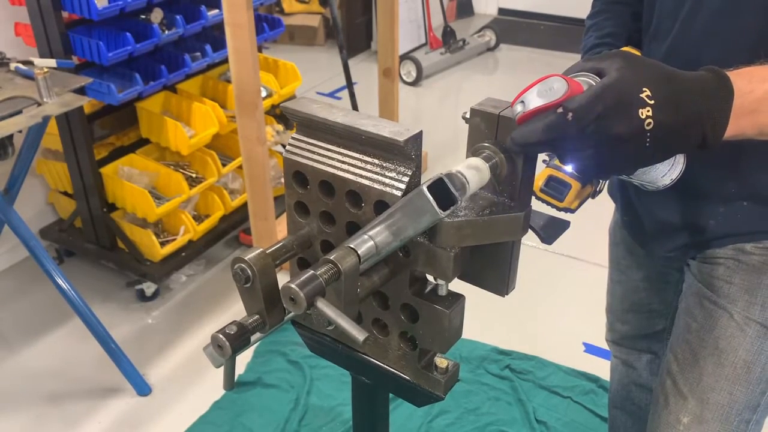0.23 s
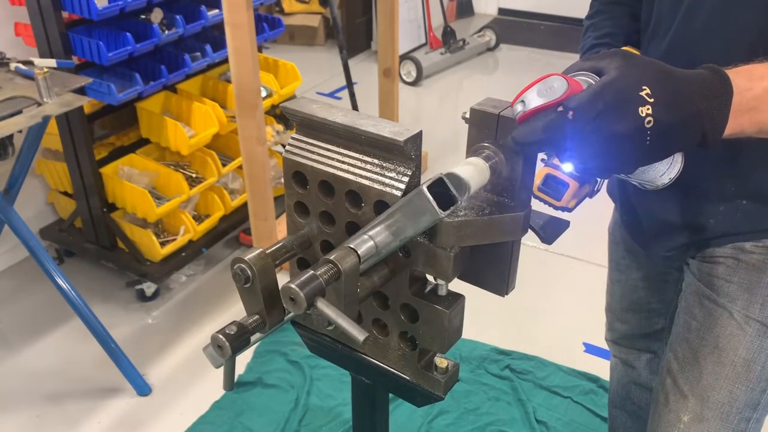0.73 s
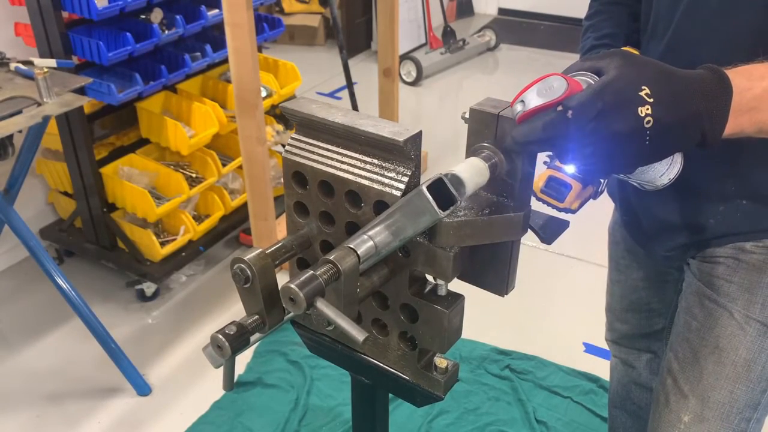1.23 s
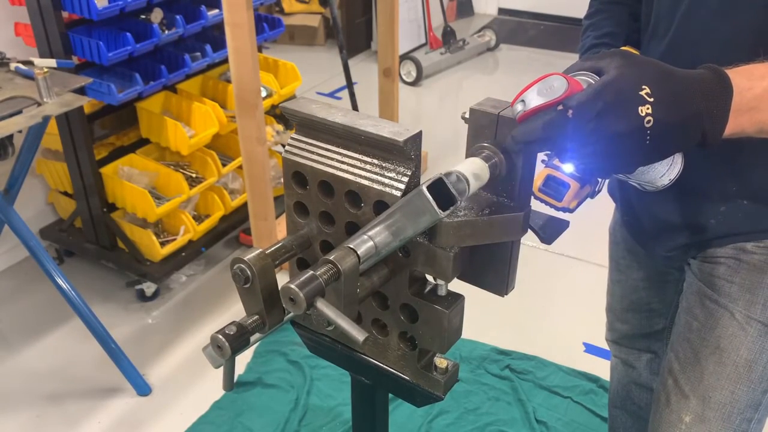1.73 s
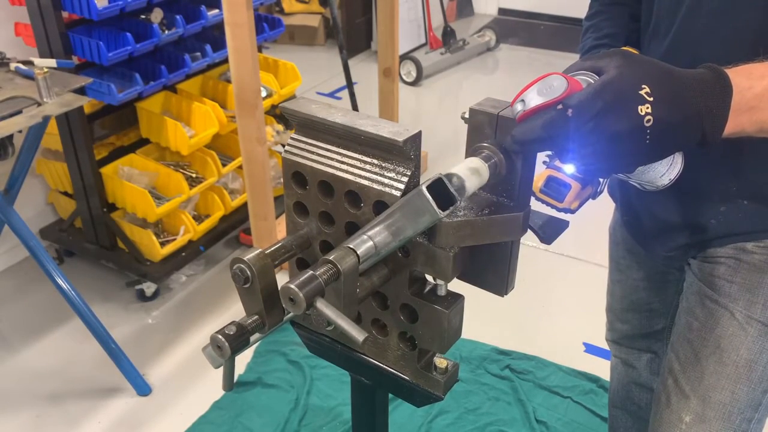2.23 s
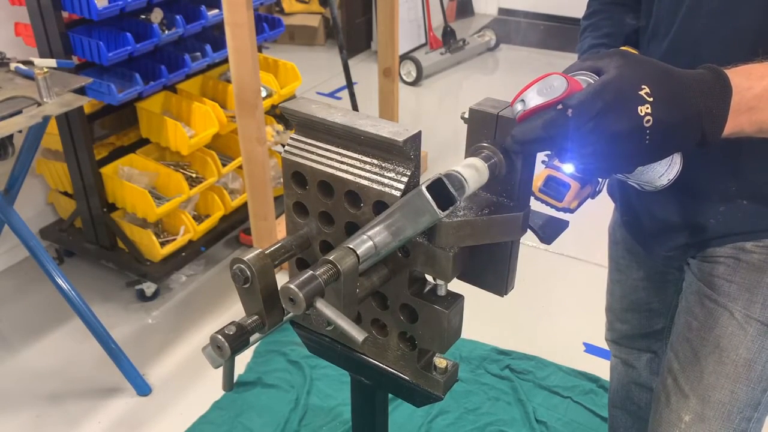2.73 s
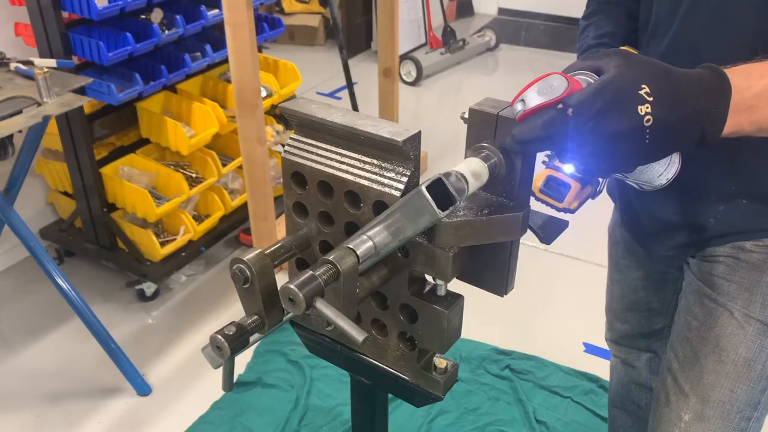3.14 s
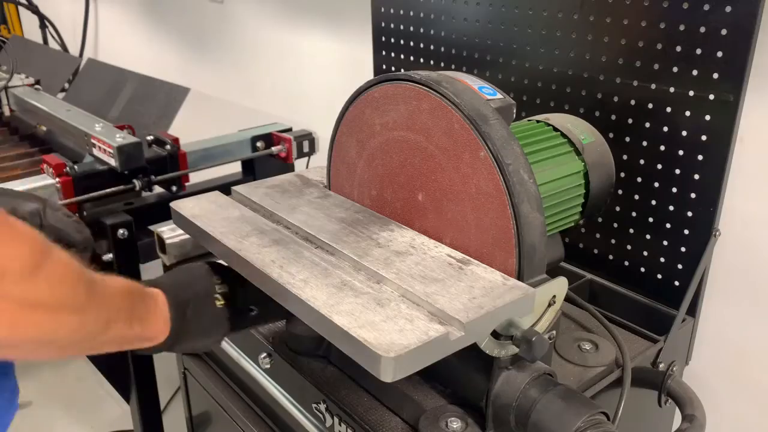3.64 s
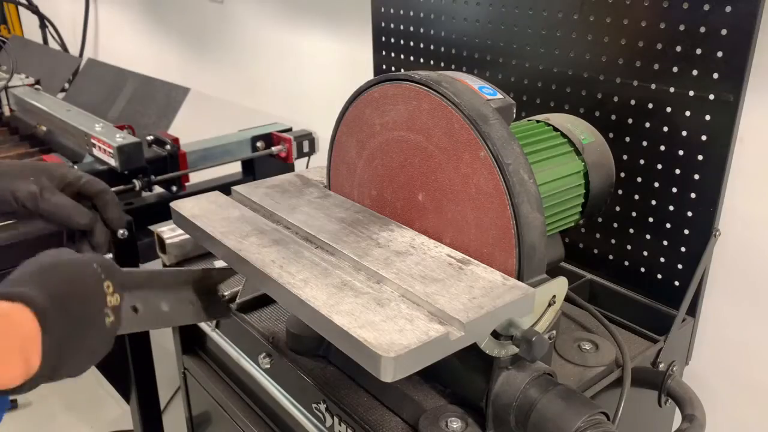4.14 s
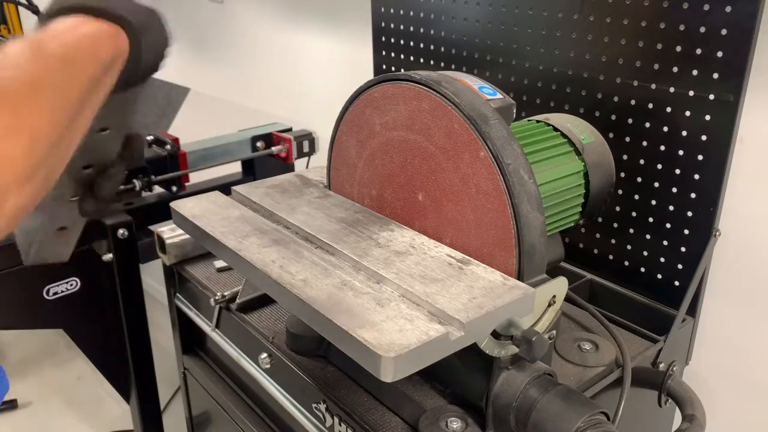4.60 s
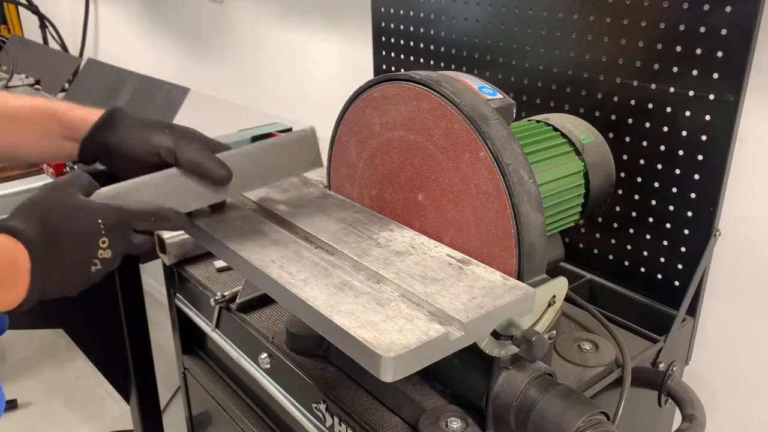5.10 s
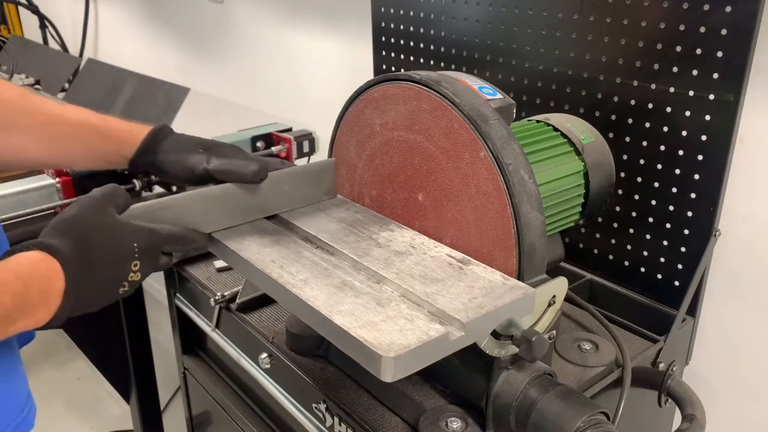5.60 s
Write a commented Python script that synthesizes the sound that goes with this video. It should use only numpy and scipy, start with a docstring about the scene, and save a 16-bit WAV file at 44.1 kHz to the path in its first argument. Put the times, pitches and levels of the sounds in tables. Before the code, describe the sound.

A worn hole saw on a cordless drill rasps through steel tube with hiss and thin squeal, then cuts to quiet room and a steel bar knocking onto a cast iron table.

```python
"""A worn hole saw on a cordless drill cuts a steel tube: noise grains swell in two bites a turn and ring resonances,
over a noise hiss, a low growl and a thin gear squeal made of two sines. The scene then jumps to a quiet corner
of the shop with low rumble and faint air. Gloves rub a steel bar (shaped noise), which is set down on a
cast iron table with a knock, bounces and slides: each contact is a noise crack and a bank of decaying modes."""
import sys
import numpy as np
from scipy import signal
from scipy.fft import rfft, irfft, next_fast_len
from scipy.io import wavfile

SR = 44100
rng = np.random.default_rng(int(sys.argv[2]) if len(sys.argv) > 2 else 0)


def nominal_scale(level):
    """Amplitude ratio for a level in decibels (scalar or array-like)."""
    x = np.asarray(level, float) / 20
    return 10 ** x


def master(y):
    """Save y as 16-bit WAV."""
    cut = np.clip(np.atleast_2d(y).T, -1, 1)
    pcm = np.round(cut * 32767)  # scale
    wavfile.write(sys.argv[1], SR, pcm.astype(np.int16))


N = 258426
TIME = np.arange(N) / SR
SIZE = next_fast_len(N + SR)
BINS_HZ = np.arange(SIZE // 2 + 1) * SR / SIZE
JUMP_S = 3.4845

# Modes of the steel bar. Each row: frequency in Hz, relative level in dB, t60 in seconds.
BAR_MODES = [(564, -15, 0.13), (769, -10.5, 0.12), (826, -14.5, 0.22), (1096, -15, 0.099),
             (1180, -9.5, 0.067), (1425, -13.5, 0.12), (1620, -19, 0.2), (1808, -13.5, 0.15),
             (1874, -5.5, 0.14), (2430, -10.5, 0.21), (2478, -4.5, 0.069), (2760, -20, 0.29),
             (3080, -29, 0.14), (3650, -20, 0.17), (3655, -17, 0.22), (3892, -19.5, 0.43),
             (3928, -3.5, 0.066), (4312, -15, 0.15), (4790, -14.5, 0.27), (4780, -18, 0.15),
             (5176, -22, 0.25), (5380, -23.5, 0.22), (6050, -26, 0.17), (7700, -21.5, 0.11),
             (8300, -16.5, 0.2), (9450, -27, 0.25), (9560, -24.5, 0.29), (9846, -25, 0.26),
             (10400, -27, 0.24), (12900, -35.5, 0.16)]


def rms_one(x):
    """Scale to unit rms."""
    return x / np.sqrt(np.mean(x ** 2) + 1e-20)


def in_time(rows):
    """Columns of a curve, sample by sample."""
    s, *columns = np.transpose(rows)
    return [np.interp(TIME, s, column) for column in columns]


def at_hz(points):
    """A spectrum read on every FFT bin, interpolated over log frequency."""
    hz, value = np.transpose(points)
    return np.interp(np.log(BINS_HZ + 1), np.log(hz + 1), value)


def coloured(x, spectrum):
    """Colour by a spectrum, keeping the power of a white input."""
    gain = rms_one(nominal_scale(at_hz(spectrum)))
    return irfft(rfft(x, SIZE) * gain, SIZE)[..., :N]


def drift(rate_hz):
    """Slow random wander of spread 1: twice low-passed noise, drawn at every 16th sample."""
    r = np.exp(-32 * np.pi * rate_hz / SR)
    noise = rng.standard_normal(N // 16 + 3002)
    slow = signal.lfilter([1], [1, -2 * r, r * r], noise)[3000:]   # start-up dropped
    return np.interp(np.arange(N) / 16, np.arange(len(slow)), rms_one(slow))


def grains(per_s, spread_db, count=1):
    """Random clicks of uneven size and sign, rms 1."""
    sizes = nominal_scale(spread_db * np.minimum(rng.exponential(1, (count, N)), 4))
    signs = rng.choice([-1, 1], (count, N))
    return rms_one(sizes * signs * (rng.random((count, N)) < per_s / SR))


def ring(clicks, hz, t60_s):
    """A unit click sets a decaying sine of starting height 1 ringing."""
    r, w = nominal_scale(-60 / (t60_s * SR)), 2 * np.pi * hz / SR
    return signal.lfilter([0, np.sin(w)], [1, -2 * r * np.cos(w), r * r], clicks + 1e-18)


def resonance(x, hz, width_hz):
    """Band-pass with gain 1 on top."""
    r = np.exp(-np.pi * width_hz / SR)
    poles = [1, -2 * r * np.cos(2 * np.pi * hz / SR), r * r]
    return signal.lfilter([(1 - r * r) / 2, 0, (r * r - 1) / 2], poles, x)


def two_ports(direct, scattered, likeness, lead_rad=0):
    """Direct sound reaches both ports alike but for a lead; scattered sound differs left and right."""
    share = np.clip(at_hz(likeness), 0, 1)
    both = rfft(direct, SIZE) * np.exp(.5j * np.outer([1, -1], lead_rad))
    mixed = np.sqrt(share) * both + np.sqrt(1 - share) * rfft(scattered, SIZE)
    return irfft(mixed, SIZE)[:, :N]


def bites(deep_db, light_db):
    """Pressure of the teeth in the tube wall: a deep and a lighter uneven bump every turn."""
    turn_s, first_deep_s, light_after_s = .1391, -.0062, .077
    half_length_s, wander_s, spread_db = .015, .004, 1.5
    turns_s = first_deep_s + turn_s * np.arange(26)
    power = 0
    for after_s, level_db in ((0, deep_db), (light_after_s, light_db)):
        luck = rng.standard_normal((len(turns_s), 2))
        centres_s = turns_s + after_s + wander_s * luck[:, 0]
        for s, luck_db in zip(centres_s, spread_db * luck[:, 1]):
            peak_db = luck_db + np.interp(s, TIME, level_db)
            power = power + nominal_scale(2 * peak_db) * np.exp(-((TIME - s) / half_length_s) ** 2)
    return np.sqrt(power)


def hole_saw():
    """Chips swell in each bite and ring the tube; rows: direct, scattered left, scattered right."""
    # Feed pressure. Each row: time in s, hiss, deep bite and light bite, each in relative dB.
    feed = [(0, -35, -42, -43), (.3, -34.5, -37, -41.5), (.9, -34.5, -38, -46.5), (1.15, -35, -43, -44),
            (1.45, -36, -39.5, -47.5), (1.75, -34.5, -38, -44), (2.1, -34.5, -34.5, -45.5),
            (2.5, -35, -38, -39.5), (2.65, -35, -34, -40), (2.8, -36, -40, -42), (2.95, -36, -32.5, -43.5),
            (3.2, -35, -36, -41), (3.48, -36, -36, -42)]
    # Gear mesh. Each row: time in s, centre pitch in Hz.
    squeal_pitch = [(0, 2485), (.4, 2465), (.75, 2500), (1.5, 2506), (2.2, 2472), (2.6, 2473), (3.0, 2425),
                    (3.48, 2445)]
    # Rubbing teeth and motor fan. Each row: frequency in Hz, relative density in dB per Hz.
    hiss_spectrum = [(410, -31), (700, -19.5), (982, -9.5), (1390, -2), (2200, -2.5), (2440, -1.5),
                     (3330, -5), (4860, -3), (7270, -11), (9430, -8), (10600, -7), (11600, -13),
                     (13400, -13), (14700, -22.5), (15700, -10.5)]
    # Breaking chips. Each row: frequency in Hz, relative density in dB per Hz.
    chip_spectrum = [(120, -61), (200, -11.5), (283, -17), (359, -15.5), (996, -6.5), (1410, -3.5),
                     (2180, 5.5), (2440, 6.5), (3320, -1.5), (4870, -5.5), (7280, -6), (9570, -6.5),
                     (11500, -12.5), (14000, -13.5), (15700, -27)]
    # Vice and stand shaking. Each row: frequency in Hz, relative density in dB per Hz.
    growl_spectrum = [(15, -48.5), (25, -15.5), (54, -10), (81, -12.5), (204, -5), (284, -6.5), (355, 1),
                      (557, -0.5), (900, 0.5), (1170, -23), (1980, -120)]
    # Tube and saw cup modes, and last a narrow bright resonance near 9.7 kHz. Each row: frequency in Hz, width
    # in Hz, relative level in dB.
    tube_modes = [(356, 20, -19), (460, 25, -3), (1417, 46, 0.5), (1760, 50, -9), (1990, 60, -32),
                  (1920, 44, -17), (2360, 60, -17.5), (2570, 60, -25), (2850, 60, -26.5), (3610, 50, -25),
                  (4180, 40, -8), (4340, 50, 0), (4920, 20, -14.5), (9700, 200, -14)]
    grip_from_s, grip_to_s, grip_edge_s = 1.8, 2.68, .04

    hiss_db, deep_db, light_db = in_time(feed)
    squeal_hz, = in_time(squeal_pitch)
    bite = bites(deep_db, light_db)
    load = bite / bite.max()

    chips = bite * nominal_scale(1.5 * drift(60)) * grains(4000, spread_db=3.2, count=3)
    tube = sum(nominal_scale(db + 6.5 + 3.5 * drift(3.9)) * resonance(chips, hz, width_hz)
               for hz, width_hz, db in tube_modes)   # each mode's level wanders

    hiss_noise = coloured(grains(9000, spread_db=1.5, count=3), hiss_spectrum)
    hiss = nominal_scale(hiss_db - 1.5 + 1.33 * drift(18.6)) * hiss_noise

    # the saw cup sings when the kerf grips it
    grip_on, grip_off = (np.tanh((TIME - s) / grip_edge_s) for s in (grip_from_s, grip_to_s))
    grip = (grip_on - grip_off) / 2
    cup = nominal_scale(-6.5 + 12.5 * grip) * resonance(hiss, 1627, width_hz=22)

    growl_db = -52.5 - 0.83 * TIME + 5.5 * load + 1.5 * drift(9)
    growl = nominal_scale(growl_db) * coloured(rng.standard_normal((3, N)), growl_spectrum)

    phase = 2 * np.pi * np.cumsum(squeal_hz + 20 * drift(8) + 16 * drift(30)) / SR
    phase = phase + np.array([0 * TIME, 1.47 * drift(8), 1.5 * drift(8)])   # scattered paths wander
    squeal = nominal_scale(-49.5 + 5 * load + 3.5 * drift(30)) * np.sin(phase)
    overtone = nominal_scale(-50.5 + 1.9 * drift(25)) * np.sin(2 * phase)
    return coloured(chips, chip_spectrum) + tube + hiss + cup + growl + squeal + overtone


def quiet_corner():
    """Lumpy building rumble (direct and scattered rows) over faint air, unlike in each port."""
    # Low rumble. Each row: frequency in Hz, relative density in dB per Hz.
    rumble_spectrum = [(13, -32), (22, -16), (43, -3.5), (69, -2), (95, -12), (156, -27.5), (183, -24),
                       (247, -33), (308, -41), (500, -57), (650, -93), (1100, -120)]
    # Still air. Each row: frequency in Hz, relative density in dB per Hz.
    air_spectrum = [(180, -13.5), (300, -1.5), (354, -11), (527, -18.5), (1020, -20.5), (4310, -17.5),
                    (6960, -22), (9380, -12), (11600, -24), (13500, -16.5), (15700, -23.5)]
    # the table keeps shaking once the bar is on it
    since_bar_s, shake_rise_s = TIME - 5.27, .03
    shake = nominal_scale(-55 - 2 * since_bar_s) * np.clip(since_bar_s / shake_rise_s, 0, 1)
    level = np.hypot(nominal_scale(-60.5 - 3 * (TIME - JUMP_S)), shake)
    rumble_noise = coloured(rng.standard_normal((3, N)), rumble_spectrum)
    rumble = level * nominal_scale(1.4 * drift(2.6)) * rumble_noise
    air = nominal_scale(-79) * coloured(rng.standard_normal((2, N)), air_spectrum)
    return rumble, air


def rubbing():
    """Fine friction noise, with the bar's modes faintly stirred; rows: direct, scattered left, scattered right."""
    # Gloves and table rubbing the bar. Each row: loudest at s, level in dB, swell in dB per s,
    # fade in dB per s, treble in dB above the level.
    strokes = [(3.63, -68.5, 110, 70, -5.5), (3.75, -72, 50, 109, -7.5), (3.86, -83, 60, 200, -8),
               (4.56, -75, 170, 58, -2), (4.66, -67, 84, 150, -9), (4.835, -72, 100, 88, -7),
               (4.98, -66.5, 550, 250, -5), (5.08, -63, 350, 250, -3.5), (5.186, -51, 243, 900, -2.5),
               (5.245, -56.5, 500, 600, -13), (5.39, -54.5, 118, 160, -13), (5.465, -59.5, 900, 82, 6.5),
               (5.655, -59, 453, 120, 5.5), (5.746, -58, 100, 61, 0)]
    # Body of the friction noise. Each row: frequency in Hz, relative density in dB per Hz.
    body_spectrum = [(290, -41), (500, -24), (813, -18), (1670, -3.5), (1880, -2), (2450, 3), (4650, 5.5),
                     (7000, -1.5), (9100, -22), (15400, -120)]
    # Treble of the friction noise. Each row: frequency in Hz, relative density in dB per Hz.
    treble_spectrum = [(3530, 1), (6000, -15), (6960, 1.5), (9870, 10.5), (11500, -8.5), (13700, 7),
                       (15700, -24)]
    level_power, treble_power = 0, 0
    for peak_s, db, swell, fade, treble_db in strokes:
        below_db = np.where(TIME < peak_s, swell * (peak_s - TIME), fade * (TIME - peak_s))
        stroke = nominal_scale(db - below_db)
        level_power = level_power + stroke ** 2
        treble_power = treble_power + (stroke * nominal_scale(treble_db)) ** 2
    grit = nominal_scale(1.0 * drift(30)) * grains(6000, spread_db=3.5, count=3)
    body = grit * np.sqrt(level_power)
    treble = grit * np.sqrt(treble_power)
    stirred = sum(nominal_scale(-9.0) * resonance(body, hz, width_hz=25) for hz, _, _ in BAR_MODES)
    return coloured(body, body_spectrum) + coloured(treble, treble_spectrum) + stirred


def tick():
    """A speck of grit: one tiny bright noise click, decaying 60 dB in 7 ms."""
    # Each row: frequency in Hz, relative density in dB per Hz.
    tick_spectrum = [(4000, -30), (7500, -8), (8500, 0), (10400, 0), (11500, -12), (13000, -3),
                     (16000, -12)]
    since_s = np.maximum(TIME - 5.0245, 0)
    envelope = nominal_scale(-51 - 60 * since_s / .007) * (since_s > 0)
    return coloured(envelope * rng.standard_normal(N), tick_spectrum)


def knocks():
    """Each contact cracks, rings the bar's modes, most those that move at the spot struck, and thuds in the table."""
    # Bar on table. Each row: time in s, strength in dB, tilt in dB per octave, thud in dB, favoured Hz.
    contacts = [(5.186, -45, 1, -60, 3300), (5.264, -12, 0, -47, 4054), (5.268, -19.5, 2, -30, 1560),
                (5.272, -20.5, -4.5, -39, 1194), (5.457, -22.5, -4.5, -42, 910),
                (5.468, -24.5, -1.5, -34.5, 8300), (5.636, -40, -9.5, -41.5, 370),
                (5.647, -35, 3, -38.5, 7700), (5.728, -38, -3, -47.5, 2440), (5.789, -39.5, -5, -53, 2600)]
    # Modes of the table. Each row: frequency in Hz, relative level in dB, t60 in seconds.
    table_modes = [(88.8, -15.5, .9), (124, -12, 0.32), (178, -19, 0.1), (274.7, -14, 0.4), (322, -1, 0.14),
                   (378, -7, 0.15)]
    # Crack noise before tilt. Each row: frequency in Hz, relative density in dB per Hz.
    crack_spectrum = [(300, -33), (700, 1.5), (1500, 10.5), (2500, 3), (4000, 3), (5500, -4), (8000, -41),
                      (12000, -45.5), (16000, -32)]
    s, strength_db, tilt_db, thud_db, spot_hz = np.transpose(contacts)
    at, out = np.round(s * SR).astype(int), np.zeros(N)

    luck = rng.standard_normal((len(at), len(BAR_MODES) + len(table_modes)))
    for k, (hz, db, t60_s) in enumerate(BAR_MODES + table_modes):
        if k < len(BAR_MODES):
            favour_db = 15 * np.exp(-(np.log2(hz / spot_hz) / 0.078) ** 2)
            level_db = strength_db - 14 + favour_db + tilt_db * np.log2(hz / 2000)
        else:
            level_db = thud_db
        clicks = np.zeros(N)
        clicks[at] = nominal_scale(level_db + db + 1.43 * luck[:, k])
        flutter = nominal_scale(4 * drift(30))   # the bar buzzes against the table
        out += flutter * ring(clicks, hz, t60_s)

    crack_t60_s = .031 * np.exp(.04 * (strength_db + 30))   # harder contacts crack longer
    noise = rng.standard_normal((len(at), SR // 5))
    for i, burst, db, tilt, t60_s in zip(at, noise, strength_db, tilt_db, crack_t60_s):
        crack = np.zeros(N + SR)
        # the many short modes die at once
        crack[i:i + len(burst)] = nominal_scale(db - 8.5 - 60 * TIME[:len(burst)] / t60_s) * burst
        tilted = [(hz, d + tilt * np.log2(hz / 2000)) for hz, d in crack_spectrum]
        out += coloured(crack[:N], tilted)
    return signal.sosfilt(signal.butter(2, 65, "high", fs=SR, output="sos"), out)


def reflections(x):
    """Quick echoes off nearby steel, of unit energy, then the shop's long dull tail; other for each side."""
    near_t60_s, shop_t60_s, shop_db, shop_cut_hz = .033, .79, -12, 2270
    t = TIME[:SR]
    near = rng.standard_normal((2, SR)) * nominal_scale(-60 * t / near_t60_s)
    dull = signal.lfilter(*signal.butter(1, shop_cut_hz, fs=SR), rng.standard_normal((2, SR)))
    shop = nominal_scale(shop_db - 60 * t / shop_t60_s) * dull * (t > .008)
    response = (near + shop) / np.sqrt(np.sum(near ** 2) / 2)
    return signal.fftconvolve(x[None], response, axes=1)[:, :N]


def scene():
    """The sawing is cut off short and the corner takes its place."""
    # Saw alike in both ports. Each row: frequency in Hz, direct share of the power (0 to 1).
    saw_likeness = [(60, .6), (250, .78), (700, .5), (2000, .48), (4000, .33), (6000, .45), (8000, .8),
                    (10000, .9), (12000, .7), (15000, .6)]
    # Phase of the saw. Each row: frequency in Hz, lead of the left port in radians.
    saw_lead = [(0, 0), (600, 0.1), (1720, -0.5), (4390, 0.1), (7150, -3.5), (9040, -6.1), (9560, -6.4),
                (11300, -9.3), (12200, -9.9), (13400, -12.4), (14400, -12.7), (15400, -15.1)]
    # Corner alike in both ports. Each row: frequency in Hz, direct share of the power (0 to 1).
    corner_likeness = [(60, .94), (150, .9), (300, .93), (640, .72), (1400, .55), (3000, .5), (7000, .45),
                       (15000, .45)]
    saw = hole_saw()
    sawing = two_ports(saw[0], saw[1:], saw_likeness, at_hz(saw_lead))
    rumble, air = quiet_corner()
    steady = rubbing() + rumble
    grit_tick = tick()
    blows = knocks()
    direct = blows + steady[0] + grit_tick
    scattered = reflections(blows) + steady[1:]
    corner = two_ports(direct, scattered, corner_likeness) + air
    fade = np.exp(-np.maximum(TIME - JUMP_S, 0) / .002)
    return sawing * fade + corner * (1 - fade)


def roll_off(x):
    """The treble ends steeply here."""
    return signal.sosfilt(signal.butter(12, 15810, fs=SR, output="sos"), x)


def record(dry):
    """The finished mix as delivered."""
    return roll_off(dry)


dry = scene()
out = record(dry)
master(out)
```